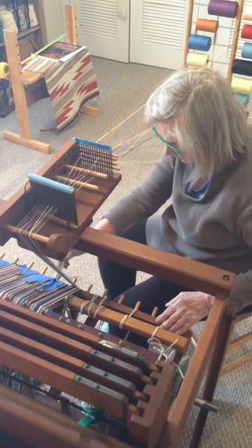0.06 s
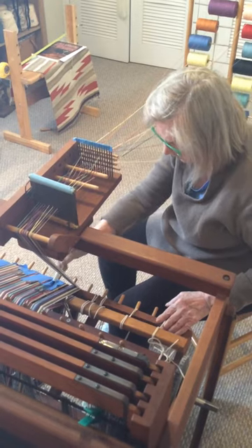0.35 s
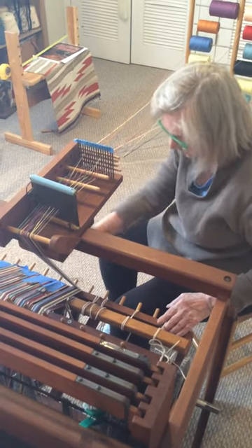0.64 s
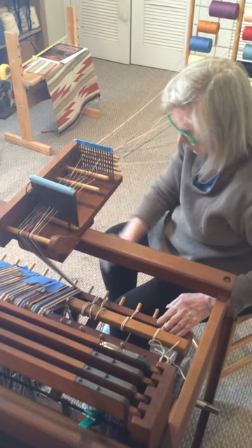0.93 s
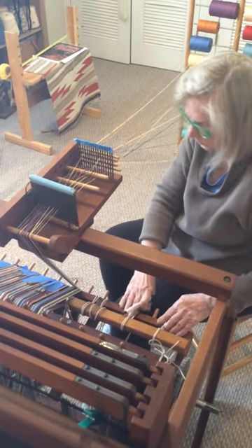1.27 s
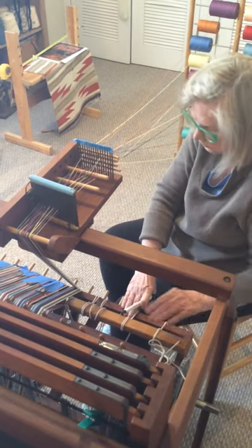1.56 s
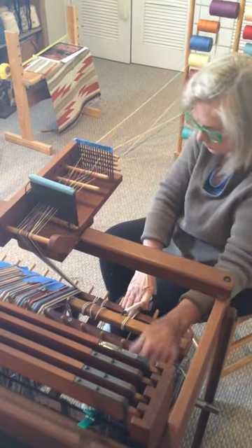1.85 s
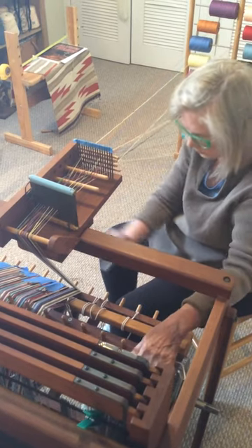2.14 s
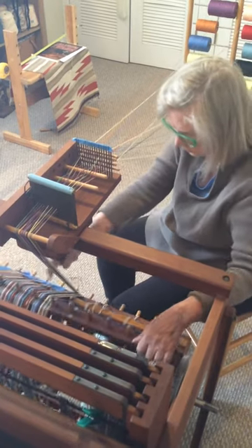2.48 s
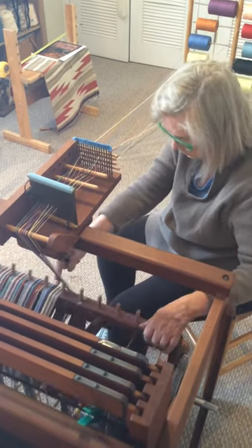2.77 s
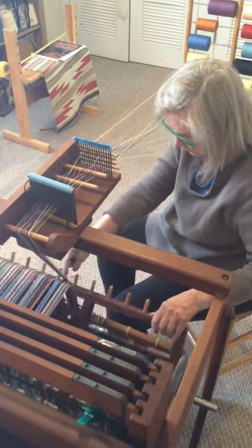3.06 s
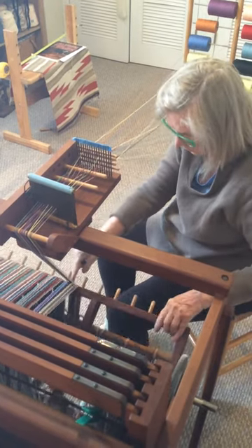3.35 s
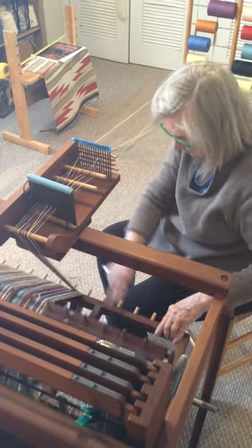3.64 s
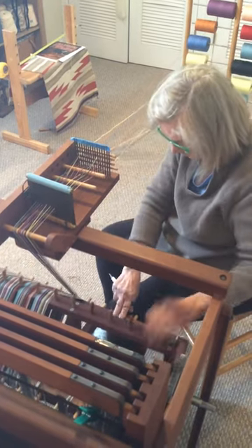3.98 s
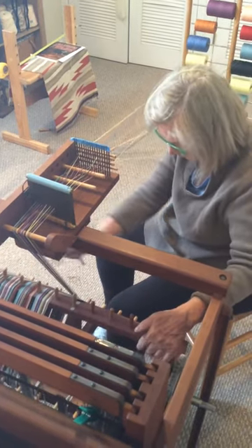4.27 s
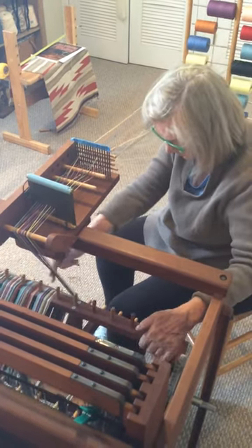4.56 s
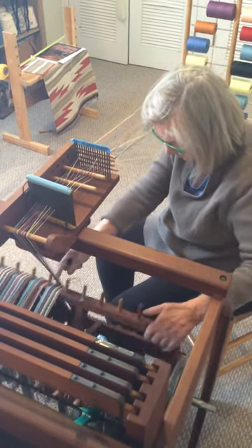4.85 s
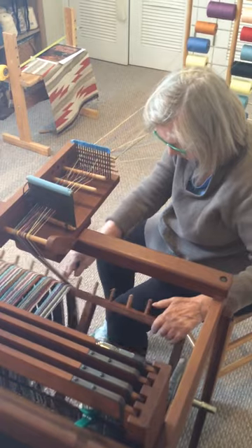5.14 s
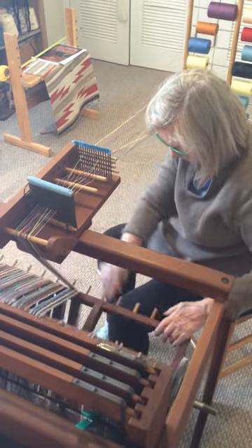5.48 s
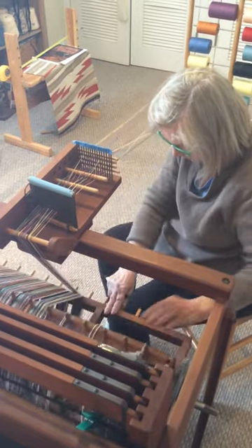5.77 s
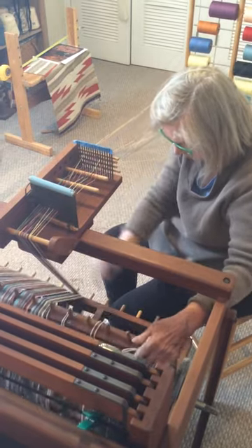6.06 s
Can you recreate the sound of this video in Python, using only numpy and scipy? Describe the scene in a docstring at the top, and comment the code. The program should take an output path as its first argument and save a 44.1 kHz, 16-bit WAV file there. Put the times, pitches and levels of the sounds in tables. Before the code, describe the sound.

In a small room, an appliance hums softly and a loom's cords give a few faint ticks. The wooden beam is then turned by hand, and a steel catch clicks over a ratchet wheel in a quick run of sharp, ringing pings, each with a light knock in the wood. After a pause with one lone click, a second, shorter run follows. The clicks sound fairly close, with a brief room echo.

```python
"""Turning a loom's ratchet

In a small carpeted room an appliance hums and whines, and a floor loom's warp cords tick faintly.
The wooden back beam is turned by hand in two runs; now and then a hand brushes the cords.
The pawl (a steel catch) scrapes up each tooth of the ratchet wheel and drops off it.
Each drop makes a hard ping, rings the wheel, knocks the frame and echoes in the room."""
import sys
import numpy as np
from scipy import signal
from scipy.fft import rfft, irfft, next_fast_len
from scipy.io import wavfile
from scipy.ndimage import map_coordinates

SR = 44100
rng = np.random.default_rng(int(sys.argv[2]) if len(sys.argv) > 2 else 0)


def wav_out(sig):
    """Save sig, one row per channel (or a flat mono array), as 16-bit PCM at SR to the path in sys.argv[1]."""
    wavfile.write(sys.argv[1], SR, np.round(np.clip(np.atleast_2d(sig).T, -1, 1) * 32767).astype(np.int16))


N = 269451

# Low rumble of the appliance and the building: pitch_hz, level_db
RUMBLE_COLOUR = [(15, -27), (28, -14), (42, -5.5), (75, -4), (110, -5), (160, -11.5), (220, -10.5),
                 (300, -8.5), (360, -16), (430, -26), (700, -55)]
# Hiss of moving air: pitch_hz, level_db
AIR_COLOUR = [(240, -50), (400, -3), (545, -2), (789, -11), (964, -13), (1160, -7.5), (1730, -9),
              (2020, -6), (2180, -14), (3210, -22), (12300, -26), (14800, -37.5), (16000, -68)]
# Fuzzy bands of hum: pitch_hz, width_hz, level_db
HUM_BANDS = [(50.5, 11.3, -52.5), (115.3, 21, -64.5), (239.6, 10, -69), (270, 14, -58.5),
             (364.6, 10.5, -70.5)]
# Thin tones of the motor: pitch_hz, level_db
MOTOR_TONES = [(866.7, -79), (931.3, -78), (985.1, -68.5), (1970, -70.5), (2083, -78)]
# Cords ticking against pegs: start_s, level_db
CORD_TICKS = [(0.406, -42.5), (0.4087, -46), (0.589, -48), (1.056, -49), (1.066, -48), (1.081, -54)]
# The snap of one tick: pitch_hz, level_db
SNAP_COLOUR = [(300, -7), (1100, 6), (2200, -5.5), (5300, -1), (7000, -9), (9000, 0), (12500, 0),
               (15500, -7)]
# Notes of a struck peg: pitch_hz, level_db, fade_s
PEG_NOTES = [(1080, -11, .07), (5230, -5, 0.043), (8460, -5, 0.077), (11500, -3, 0.033)]
# Roughly how long the room's echo lasts: pitch_hz, fade_s
ROOM_FADES = [(200, 0.71), (450, 0.3), (1000, 0.28), (3000, 0.29), (7000, 0.27), (14000, 0.21)]
# Noise of scraping and brushing: pitch_hz, level_db
RUBBING_COLOUR = [(500, -2), (2000, -4.5), (4000, -2), (5500, -4.5), (7200, -15), (9000, -3.5),
                  (13000, -7.5), (15500, -8.5)]
# A hand brushing the cords: middle_s, length_s, level_db
HAND_BRUSHES = [(1.914, .25, -74), (4.025, 0.094, -66), (4.206, 0.027, -80), (4.75, 0.19, -70)]
# The pawl's drops: start_s, level_db, brightness_db, knock_db, overtone_db
# The last three are compared with a usual drop; the overtone is the wheel's, near 8 kHz.
PAWL_DROPS = [(2.3566, -15, -3, 0.5, -3), (2.561, -14, 1, 4, 2.5), (2.7291, -13, 2.5, 2, 2),
              (2.8527, -14.5, 3, 6, 2), (2.956, -15, -3.5, 5, -5.5), (3.0532, -13.5, -2, 7, 0.5),
              (3.1659, -12.5, -1.5, -0.5, 3.5), (3.2741, -13.5, -0.5, 0, 6), (3.3804, -13, 3, 1, -0.5),
              (3.4781, -13, 5.5, 2, 4), (3.5718, -14, 5, -1.5, 2.5), (3.6815, -12, 5, -.5, -4),
              (3.8305, -16.5, -0.5, -4, -1), (4.3198, -15, 6.5, -5, -6), (4.8018, -16.5, -4.5, -1, -5.5),
              (4.9303, -12.5, 1, 0, -0.5), (5.0453, -12, -3, 1.5, -1), (5.1421, -14.5, 3.5, -4, -6),
              (5.2417, -12, 0.5, -8, -1), (5.343, -13, 3.5, -3.5, 3.5), (5.4452, -14.5, 4, 2.5, -1),
              (5.5615, -17, 6, 3.5, 1), (5.8235, -15, 4, 4.5, -5)]
# Steel chattering on steel: pitch_hz, level_db
CHATTER_COLOUR = [(1500, -13), (5000, 3.5), (7300, -5), (10000, 2.5), (12500, -8), (15000, -29)]
# Clatter of loom and room after a drop: pitch_hz, level_db
CLATTER_COLOUR = [(130, -36), (210, 3), (600, 2), (850, 5.5), (1500, 5), (1800, -2), (2400, 2.5),
                  (4100, 6.5), (4700, 2.5), (6200, 3), (7300, -6), (8300, -0.5), (12500, 1.5), (15500, -13)]
# Ringing notes of the steel wheel and pawl: pitch_hz, width_hz, level_db
STEEL_NOTES = [(2258, 40, -4), (3106, 28, -2), (3590, 22, -2), (3654, 40, -4), (4045, 55, -3),
               (4145, 30, -5), (4290, 100, -7), (5805, 60, -7), (6217, 50, -10), (8235, 115, -1.5),
               (9910, 50, -8), (10100, 45, -6), (10460, 70, -3), (10930, 55, -5), (11680, 80, -7),
               (13910, 40, -10)]
# Notes of the wooden frame: pitch_hz, level_db, fade_s
FRAME_NOTES = [(228.4, 0.5, 0.37), (256.3, -5, 0.12), (322, -8.5, 0.11), (376.4, -1, 0.4),
               (404.6, -2, 0.28), (826, 7.5, 0.071), (1027, -31.5, 0.48), (1367, 1.5, 0.16),
               (1525, 5.5, 0.12)]
# The dull knock in the frame: pitch_hz, level_db
KNOCK_COLOUR = [(150, -39), (300, -26), (600, -1.5), (1300, 4), (1900, -8), (5000, -30)]

TURN_START_S, TURN_END_S = 1.6, 6.22  # the beam moves between these times
SCRAPE_DB, SCRAPE_DB_PER_DOUBLING = -67.5, 4.5  # at a tooth's tip, one tooth a second; rise with speed
CLIMB_DB = 30  # how much the scrape grows from a tooth's root to its tip
USUAL_DROP_DB = -14
PING_HZ, HARDER_HZ_PER_DB, BRIGHTER_HZ_PER_DB = 4033, 39, 17  # harder, sharper drops ping higher
ECHO_DB, ECHO_SHARE = -30.5, 0.44  # a usual drop's echo; it only partly follows the drop's level
CHATTER_DB, WHEEL_DB, FRAME_DB, KNOCK_DB = -15, -0.9, -34, -11.5  # added to each drop's level
OVERTONE_LIFT_DB, FRAME_DELAY_S, TOP_HZ = 2.5, 0.0095, 15350


def amp(db):
    """Turn decibels into a number to multiply a sound by."""
    return 10 ** (np.asarray(db) / 20)


def unit(sound):
    """Scale a sound so that its average size (rms) is 1."""
    return sound / np.sqrt(np.mean(sound ** 2) + 1e-20)


def along(points, hz):
    """Read between the (pitch_hz, value) points, giving every octave equal room."""
    pitches, values = np.transpose(points)
    return np.interp(np.log(hz + 1), np.log(pitches), values)


def filtered(sound, gain_at):
    """Turn each pitch in a sound up or down by gain_at(hz)."""
    size = next_fast_len(len(sound) + 8192)
    hz = np.fft.rfftfreq(size, 1 / SR)
    return irfft(rfft(sound, size) * gain_at(hz), size)[:len(sound)]


def white(samples):
    """Plain noise, equally strong at every pitch."""
    return rng.standard_normal(samples)


def tinted(noise, colour):
    """Give noise a colour (a balance of low and high pitches), at an average size of 1."""
    return unit(filtered(noise, lambda hz: amp(along(colour, hz))))


def wobble(per_s):
    """A smooth curve through per_s random values each second."""
    return map_coordinates(white(256), [np.arange(N) * per_s / SR], mode="mirror")


def fade(t, fade_s):
    """Die away by 60 dB in fade_s seconds."""
    return np.exp(-np.log(1000) * t / fade_s)


def swell(t, rise_s):
    """A soft start, rising from 0 towards 1."""
    return 1 - np.exp(-np.maximum(t, 0) / rise_s)


def add(track, start_s, sound):
    """Mix a sound into the track at start_s."""
    start = round(start_s * SR)
    track[start:start + len(sound)] += sound[:N - start]


def ring(notes, t, scatter_db):
    """A struck object's fading notes, in a slightly new balance each time."""
    hz, db, fade_s = np.transpose(notes)[:, :, None]
    strength = amp(db + scatter_db * rng.standard_normal(hz.shape))
    waves = np.sin(2 * np.pi * (hz * t + rng.random(hz.shape)))
    return np.sum(strength * fade(t, fade_s) * waves, axis=0)


def tail(sound):
    """Make steady noise die like a crowd of echoes: it holds a moment, then fades, treble first."""
    hz, t, spectrum = signal.stft(sound, SR, nperseg=256)
    age = t / along(ROOM_FADES, hz)[:, None]
    return signal.istft(spectrum * fade(age ** 1.264, 0.94), SR, nperseg=256)[1][:len(sound)]


def appliance():
    """A running appliance: low rumble, hissing air, fuzzy hum and a thin motor whine."""
    rumble = amp(-56) * tinted(white(N), RUMBLE_COLOUR)
    air = amp(-64.5) * tinted(white(N), AIR_COLOUR)
    hum, whine = np.zeros(N), np.zeros(N)
    for pitch_hz, width_hz, db in HUM_BANDS:
        band = filtered(white(N), lambda hz: 1 / (1 + (2 * (hz - pitch_hz) / width_hz) ** 2))
        hum += amp(db) * unit(band)
    drift = np.cumsum(0.00041 * wobble(per_s=4.08))  # the motor's speed wanders slightly
    motor_time = (np.arange(N) + drift) / SR
    for pitch_hz, db in MOTOR_TONES:
        tone = np.sqrt(2) * np.sin(2 * np.pi * pitch_hz * motor_time)
        whine += amp(db + 0.31 * wobble(per_s=2.87)) * tone
    return rumble + air + hum + whine


def cord_ticks():
    """A handled cord snaps lightly against a peg, which rings with a faint echo."""
    track, t = np.zeros(N), np.arange(SR // 3) / SR
    for start_s, db in CORD_TICKS:
        snap = tinted(white(len(t)), SNAP_COLOUR) * fade(t, 0.018)
        peg = amp(-6) * ring(PEG_NOTES, t, scatter_db=-2.0)
        echo = amp(-11.5) * tail(tinted(white(len(t)), SNAP_COLOUR))
        add(track, start_s, amp(db - 4) * (snap + peg + echo))
    return track


def rubbing():
    """The pawl scrapes up each tooth, louder near the tip and at speed; a hand brushes the cords."""
    t = np.arange(N) / SR
    tooth_times = np.array([TURN_START_S, *np.transpose(PAWL_DROPS)[0], TURN_END_S])
    teeth_passed = np.interp(t, tooth_times, np.arange(len(tooth_times)))
    teeth_per_s = np.maximum(np.gradient(teeth_passed) * SR, 1e-6)
    left_to_climb = 1 - teeth_passed % 1
    scrape = amp(SCRAPE_DB + SCRAPE_DB_PER_DOUBLING * np.log2(teeth_per_s) - CLIMB_DB * left_to_climb)
    brushes = sum(amp(db) * np.exp(-(2 * (t - middle_s) / length_s) ** 2)
                  for middle_s, length_s, db in HAND_BRUSHES)
    uneven = amp(2.5 * wobble(per_s=35))
    return (scrape + brushes) * uneven * tinted(white(N), RUBBING_COLOUR)


def pawl_ping(t, hz, fade_s, bounce_db, hold_s):
    """The pawl's short note: it lands, bounces four waves later and is choked as it settles."""
    note = lambda age: np.sin(2 * np.pi * hz * age) * fade(age, fade_s)
    since_bounce = np.maximum(t - 4 / hz, 0)
    choke = 1 / (1 + (t / hold_s) ** 6)
    return -(note(t) + amp(bounce_db) * note(since_bounce)) * choke


def steel_chatter(t, brightness_db):
    """Steel rattles on steel for an instant as the pawl lands."""
    burst = tinted(white(len(t)), CHATTER_COLOUR) * fade(t, 0.038) * swell(t, 0.0001)
    return amp(CHATTER_DB + brightness_db) * burst


def room_echo(shared_echoes, brightness_db, knock_db):
    """Loom and room clatter after a drop; the loom stays put, so the echoes are partly alike."""
    echoes = unit(0.62 * shared_echoes + white(len(shared_echoes)))
    tilt = [(300, 0), (1000, 0.21 * knock_db - 0.4), (3500, 0.013), (9000, 0.28 * brightness_db + 2.5)]
    return tail(tinted(tinted(echoes, CLATTER_COLOUR), tilt))


def wheel_ring(t, brightness_db, overtone_db, scatter_db):
    """The steel wheel rings; where the pawl lands decides which notes stand out."""
    pitch_hz, width_hz, db = np.transpose(STEEL_NOTES)
    lift = [(6300, 0.0058), (8200, OVERTONE_LIFT_DB + overtone_db), (9900, brightness_db + 0.4)]
    strength = amp(db + along(lift, pitch_hz) + scatter_db * rng.standard_normal(len(db)))
    # each note is a narrow band of noise
    bands = lambda hz: (1 + ((hz - pitch_hz[:, None]) / width_hz[:, None]) ** 2) ** -3
    ringing = filtered(white(len(t)), lambda hz: np.sqrt(strength ** 2 @ bands(hz)))
    return tail(ringing) * fade(t, 0.79)


def frame_knock(t, knock_db):
    """The heavy wooden frame takes the blow with a dull knock and rings on."""
    wood = amp(FRAME_DB + 0.5 * knock_db) * ring(FRAME_NOTES, t, scatter_db=4)
    knock = amp(KNOCK_DB + knock_db) * tinted(white(len(t)), KNOCK_COLOUR) * fade(t, 0.013)
    return (wood + knock) * swell(t, 0.0016)


def ratchet():
    """Each drop of the pawl pings, echoes, rings the wheel and, a moment later, shakes the frame."""
    track, t = np.zeros(N), np.arange(SR // 2) / SR
    shared_echoes = white(len(t))
    for start_s, db, brightness_db, knock_db, overtone_db in PAWL_DROPS:
        harder_db = db - USUAL_DROP_DB
        ping_hz = PING_HZ + HARDER_HZ_PER_DB * harder_db + BRIGHTER_HZ_PER_DB * brightness_db
        ping = amp(-1.5) * pawl_ping(t, ping_hz, fade_s=0.0069, bounce_db=-3.0, hold_s=0.002)
        chatter = steel_chatter(t, brightness_db)
        echo = amp(ECHO_DB + ECHO_SHARE * harder_db) * room_echo(shared_echoes, brightness_db, knock_db)
        wheel = amp(db + WHEEL_DB) * wheel_ring(t, brightness_db, overtone_db, scatter_db=2.5)
        add(track, start_s, amp(db) * (ping + chatter) + (echo + wheel) * swell(t, 0.0013))
        add(track, start_s + FRAME_DELAY_S, amp(db) * frame_knock(t, knock_db))
    return track


def scene():
    """Mix the loom and the appliance into one channel."""
    return (ratchet() + rubbing() + cord_ticks() + appliance())[None]


def record(dry):
    """Cut away the highest treble, above TOP_HZ."""
    return np.array([filtered(channel, lambda hz: 1 / (1 + (hz / TOP_HZ) ** 200)) for channel in dry])


dry = scene()
out = record(dry)
wav_out(out)
```